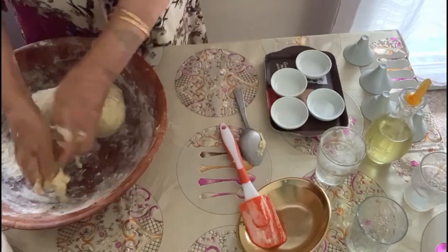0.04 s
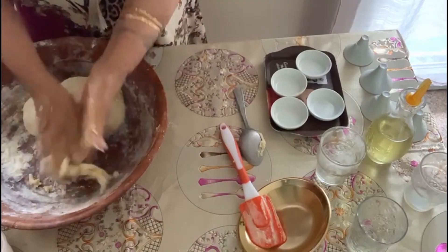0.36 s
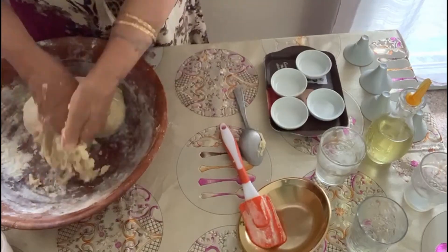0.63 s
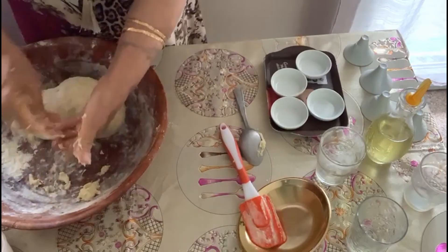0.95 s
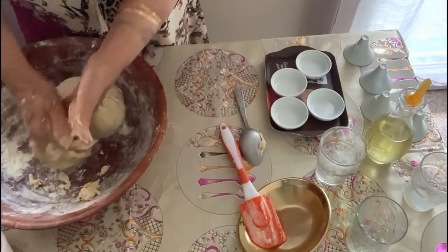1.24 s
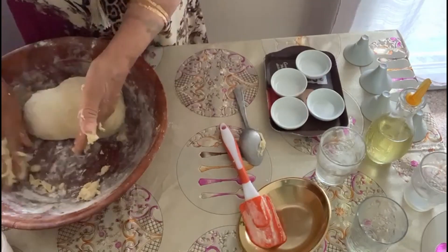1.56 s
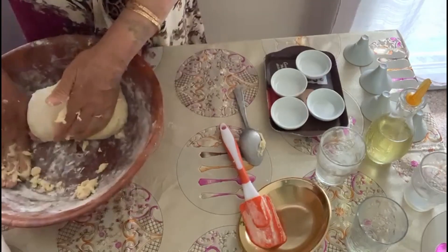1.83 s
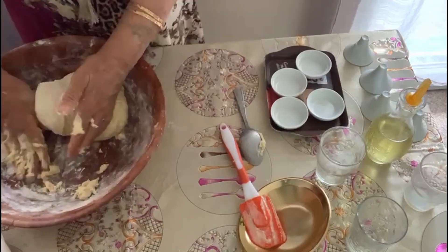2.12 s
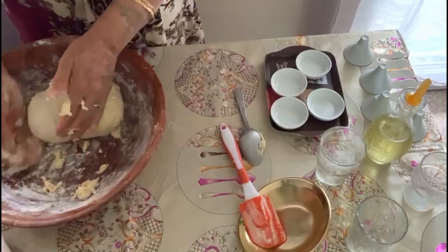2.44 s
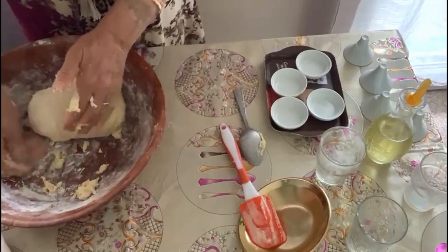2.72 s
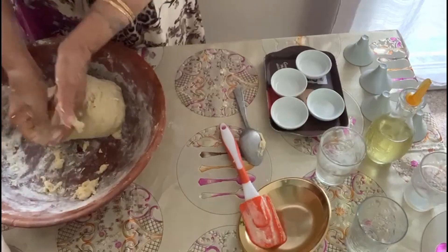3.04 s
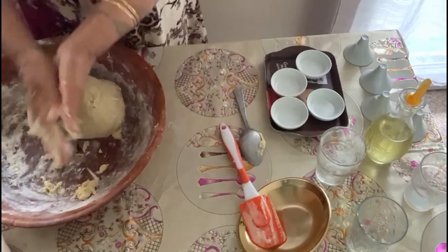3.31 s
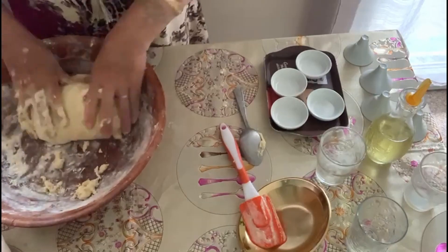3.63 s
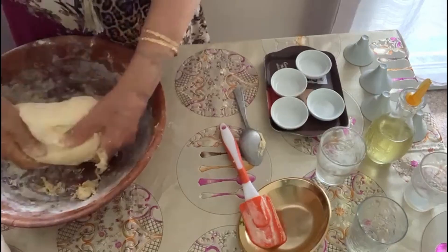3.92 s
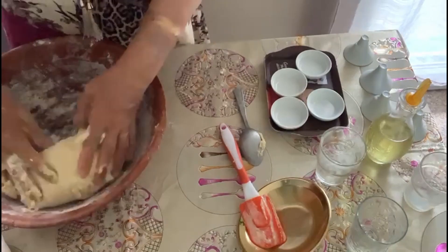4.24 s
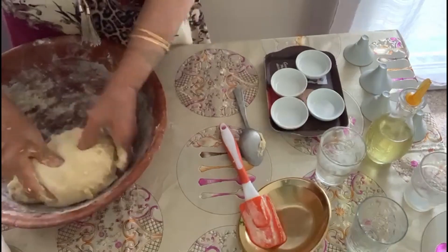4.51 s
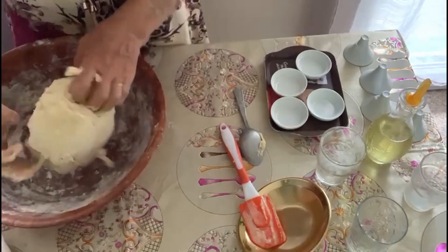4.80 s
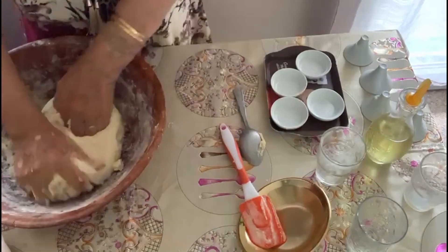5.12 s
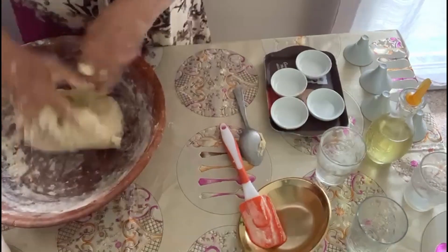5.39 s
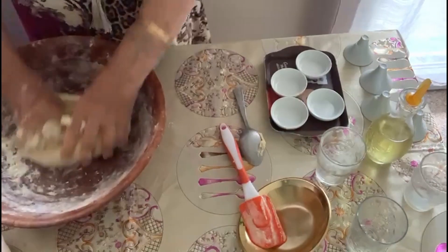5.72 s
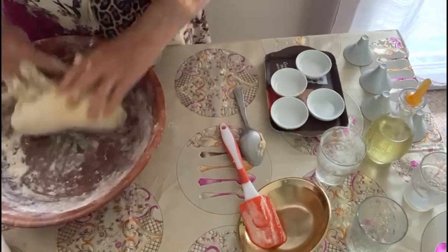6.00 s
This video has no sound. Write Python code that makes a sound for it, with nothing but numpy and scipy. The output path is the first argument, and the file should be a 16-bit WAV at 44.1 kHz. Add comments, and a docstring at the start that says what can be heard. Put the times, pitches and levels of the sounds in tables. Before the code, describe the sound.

Quiet dry rubbing and sticky pops of dough being kneaded, broken by a clay bowl knocking the table and dough thudding down.

```python
"""Soft fingertip pats and dry rubbing come first: hands work a lump of dough in a wide clay bowl.
The bowl is on a kitchen table, close to a stereo microphone and to its left. Palms wipe the floury
clay and roll the dough, which rumbles, peels and pops. The bowl tips and gives the table one loud knock;
later the dough is thrown down with a dull thump. Bangles tinkle faintly; the small room hums and answers.
"""
import sys
import numpy as np
from scipy import signal
from scipy.fft import rfft, irfft, next_fast_len
from scipy.io import wavfile
from scipy.ndimage import uniform_filter1d, map_coordinates

SR = 44100
rng = np.random.default_rng(int(sys.argv[2]) if len(sys.argv) > 2 else 0)


def transcribe(signal):
    """Save signal, clipped to [-1, 1], as a 16-bit WAV file at the path in sys.argv[1]."""
    frames = np.atleast_2d(signal).T
    limited = np.clip(frames, -1, 1)
    pcm = np.round(limited * 32767).astype(np.int16)
    wavfile.write(sys.argv[1], SR, pcm)


N = 266845


def amp(db):
    """Decibels to gain."""
    return 10 ** (np.asarray(db) / 20)


def unit(x):
    """Scale to rms 1."""
    return x / np.sqrt(np.mean(x ** 2) + 1e-20)


def along(points, hz):
    """Read (f/Hz, value) points on a log frequency axis."""
    f, values = np.transpose(points)
    return np.interp(np.log(hz + 1), np.log(f + 1), values)


def envelope(start, length, attack_s, sag_db_per_s, fade_db_per_s):
    """Gain for one move of the hand: a smooth rise, a sagging hold and a fade."""
    t = np.maximum(np.arange(N) / SR - start, 0)
    rise = np.sin(np.pi / 2 * np.minimum(t / attack_s, 1)) ** 2
    return rise * amp(-sag_db_per_s * t - fade_db_per_s * np.maximum(t - length, 0))


def pulse(t, attack_s, t60):
    """Gain for one touch: a rounded onset and an exponential decay."""
    return amp(-60 * t / t60) * (1 - np.exp(-t / attack_s))


def wobble(rate):
    """A smooth random curve, rate knots a second."""
    knots = rng.standard_normal(int(N * rate / SR) + 4)
    return map_coordinates(knots, [np.arange(N) * rate / SR])


def filtered(x, response):
    """Pass x through a frequency response."""
    n = x.shape[-1]
    padded = next_fast_len(n + 8192)
    return irfft(rfft(x, padded) * response(np.fft.rfftfreq(padded, 1 / SR)), padded)[..., :n]


def colour(x, spectrum):
    """Shape x by a (f/Hz, level/dB) spectrum, at rms 1."""
    return unit(filtered(x, lambda hz: amp(along(spectrum, hz))))


def edge(x, hz, kind, order):
    """Causal low-pass or high-pass."""
    return signal.sosfilt(signal.butter(order, min(hz, .45 * SR), kind, fs=SR, output='sos'), x)


def resonance(f, hz, width_hz):
    """Response of one resonance."""
    return 1j * f * width_hz / (hz * hz - f * f + 1j * f * width_hz)


def ring(modes, t):
    """Decaying modes, at slightly new strengths for each blow."""
    return sum(amp(db + rng.normal() - 60 * t / t60) * np.sin(2 * np.pi * hz * t)
               for hz, db, t60 in modes)


def add(track, start, x):
    """Mix x into the track from start, in seconds."""
    part = track[:, round(start * SR):][:, :x.shape[-1]]
    part += x[..., :part.shape[1]]


# Likeness of the microphone's two sides: f/Hz, correlation
LIKENESS = [(60, 0.85), (140, 0.68), (280, 0.45), (600, -0.1), (1000, 0.1), (1600, 0.35), (2800, 0.25),
            (6700, 0.15), (8000, 0.98), (9900, 0.98), (10700, 0.7), (11700, 0.55)]
def spread(pair):
    """Two unrelated signals become left and right, more or less alike at each frequency."""
    def mid_side_gains(hz):
        angle = np.arccos(np.clip(along(LIKENESS, hz), -1, 1)) / 2
        return np.array([np.cos(angle), np.sin(angle)])
    mid, side = filtered(pair, mid_side_gains)
    return np.array([mid + side, mid - side])


def noise():
    """Stereo white noise."""
    return spread(rng.standard_normal((2, N)))


# Decay of the small kitchen: f/Hz, t60/s
KITCHEN_DECAY = [(100, 0.42), (400, 0.45), (2000, 0.36), (6000, 0.61), (12000, 0.039)]
def in_room(x, wet_db):
    """The close sound reaches the microphone with a fresh diffuse tail from the walls."""
    hz, t, spectra = signal.stft(rng.standard_normal((2, SR // 2)), SR, nperseg=256)
    decay = pulse(t, attack_s=0.0012, t60=along(KITCHEN_DECAY, hz)[:, None])
    tail = signal.istft(spectra * decay, SR, nperseg=256)[1]
    tail = edge(spread(tail / np.linalg.norm(tail[0])), 172, 'high', order=3)
    return x + amp(wet_db) * signal.fftconvolve(x[None], tail, axes=1)[:, :len(x)]


# Bands of the kitchen's drone: f/Hz, width/Hz, level/dB
DRONE_BANDS = [(53.6, 21.8, -63), (260, 29, -66.5), (320, 60, -78), (386.8, 14.5, -78), (548, 99, -81.5)]
# Quiet air around the microphone: f/Hz, level/dB
AIR_SPECTRUM = [(15, -51.5), (25, -28), (63, -15), (165, -1), (255, 2.5), (314, -43), (406, -1.5),
                (487, -28.5), (881, -11), (1140, -23), (1440, -19), (2230, -32), (4260, -28.5), (8110, -42),
                (12000, -41), (15500, -90.5), (22000, -120)]
def room_tone():
    """The kitchen behind the hands: a low steady drone in quiet air."""
    drone = sum(amp(db) * unit(filtered(noise(), lambda f: resonance(f, hz, width) ** 2))
                for hz, width, db in DRONE_BANDS)
    return drone + amp(-67.5) * colour(noise(), AIR_SPECTRUM)


# The arms lean on the dough: t/s, length/s, level/dB
ARM_PRESSES = [(0.603, 0.2, -87), (1.302, 0.048, -57.5), (1.59, 0.12, -57.5), (2.485, 0.22, -77),
               (2.662, 0.036, -56.5), (2.849, 0.16, -60), (3.137, 0.058, -87), (3.68, 0.23, -55),
               (4.458, 0.059, -47), (4.843, 0.35, -59.5), (5.292, 0.031, -54.5), (5.906, 0.16, -59)]
# Rumble through the table: f/Hz, level/dB
RUMBLE_SPECTRUM = [(30, -35.5), (60, 3), (90, 3.5), (145, 5), (200, -8), (350, -7), (700, -11.5),
                   (1500, -91)]
def pressing():
    """Dough yields under the palms and rumbles through the table."""
    power = amp(-66.5 + 2.5 * wobble(6.9)) ** 2  # light, uneven handling between presses
    for start, length, db in ARM_PRESSES:
        weight = envelope(start, length, attack_s=0.053, sag_db_per_s=10.5, fade_db_per_s=140)
        power += (amp(db) * weight) ** 2
    return np.sqrt(power) * colour(noise(), RUMBLE_SPECTRUM)


# Bangles meet above the bowl: t/s, level/dB
WRIST_TOUCHES = [(4.700, -60), (4.803, -73)]
# Modes of a bangle: f/Hz, level/dB, t60/s
BANGLE_MODES = [(5335, -6, .1), (5572, 0, .11), (5690, -7, .07)]
def bangles():
    """Thin metal rings touch on the wrist, damped by the skin."""
    out, t = np.zeros((2, N)), np.arange(SR // 2) / SR
    for start, db in WRIST_TOUCHES:
        tinkle = ring(BANGLE_MODES, t) * (1 - np.exp(-t / .004))
        add(out, start, amp(db) * in_room(tinkle, wet_db=-18))
    return out


def pats(span_s=1.2, per_s=22, centre_hz=513, spread_octaves=0.66):
    """At the opening, fingertips dab crumbs off the clay: soft, dull touches at random moments."""
    out, t = np.zeros((2, N)), np.arange(SR // 4) / SR
    for when, size, pitch in rng.uniform(-0.97, 1, (round(per_s * span_s), 3)):
        hz = centre_hz * 2 ** (spread_octaves * pitch)
        touch = rng.standard_normal(len(t)) * pulse(t, attack_s=.012, t60=.07)
        pat = filtered(touch, lambda f: resonance(f, hz, hz / 2) ** 2)
        pat /= np.abs(pat).max()
        add(out, span_s * (when + 1) / 2, amp(-66 + 3 * size) * in_room(pat, wet_db=-3.5))
    return out


def grains(per_s, size_range_db, smear):
    """Tiny slips of random size; smear is the share of power blurred into a rush by the room."""
    size = amp(size_range_db * rng.random(N)) * rng.choice([-1, 1], N)
    slips = unit(size * (rng.random(N) < per_s / SR))
    return np.sqrt(1 - smear) * slips + np.sqrt(smear) * noise()


# Folded dough peels off skin and clay: t/s, length/s, level/dB
DOUGH_PEELS = [(1.31, 0.021, -73.5), (2.999, 0.025, -70), (4.014, 0.029, -76), (4.891, 0.18, -70),
               (5.133, 0.099, -66.5), (5.282, 0.05, -64.5)]
# Snapping threads, heard close: f/Hz, level/dB
PEEL_SPECTRUM = [(1200, -18), (2400, -3), (3300, 0), (4300, -4), (6500, -14), (11000, -24)]
def peeling():
    """Sticky threads snap one by one in a fine crackle as the dough pulls away."""
    pull = sum(amp(db) * envelope(start, length, attack_s=.012, sag_db_per_s=0, fade_db_per_s=260)
               for start, length, db in DOUGH_PEELS)
    return pull * colour(grains(per_s=220, size_range_db=12, smear=.5), PEEL_SPECTRUM)


# Short sticky pops and the quick juddering slips of a scrape on the clay: t/s, level/dB, f/Hz, t60/s
POPS_AND_SLIPS = [(0.122, -64.5, 2130, 0.023), (0.345, -65, 1510, 0.023), (1.2144, -54, 1730, .015),
                  (1.3303, -50.5, 2205, 0.021), (1.475, -65, 2300, 0.0089), (1.6117, -50.5, 2100, 0.033),
                  (2.4045, -59.5, 1700, 0.011), (2.653, -45, 2160, 0.04), (2.763, -49, 1980, 0.012),
                  (2.7757, -38, 1443, 0.034), (2.7864, -42, 2150, 0.018), (2.797, -40, 1739, 0.038),
                  (3.4106, -53.5, 2030, 0.027), (3.5227, -56, 1800, 0.011), (3.594, -54.5, 2350, 0.021),
                  (4.014, -50.5, 2446, 0.035), (4.42, -48.5, 2140, 0.042), (4.427, -48.5, 1189, 0.047),
                  (4.4797, -31.5, 2090, 0.018), (4.5119, -36, 1897, 0.057), (4.6977, -51.5, 1274, 0.018),
                  (4.802, -66, 1260, .025), (4.839, -58, 1033, 0.015), (4.8457, -50.5, 910, 0.026),
                  (4.886, -46, 826, 0.12), (4.919, -40.5, 895, 0.088)]
def pops_and_slips():
    """Sticky dough pops and a scrape judders on the clay: each is a brief ring with a soft crackle."""
    out, t = np.zeros((2, N)), np.arange(SR // 2) / SR
    for start, db, hz, t60 in POPS_AND_SLIPS:
        band = filtered(rng.standard_normal(len(t)), lambda f: resonance(f, hz, 1.1 * hz))
        crackle = amp(-1.5) * unit(edge(band, 2.22 * hz, 'low', order=2))
        tick = (np.sin(2 * np.pi * hz * t) + crackle) * pulse(t, attack_s=0.00096, t60=t60)
        add(out, start, amp(db) * in_room(tick / np.abs(tick).max(), wet_db=-2))
    return out


def crumbs(per_s=260, centre_hz=2150, size_range_db=10, life_cycles=24):
    """Dry crumbs tick under the palm, each at its own pitch, which drifts as the hand changes shape."""
    when, size, pitch = rng.random((round(per_s * N / SR), 3)).T[..., None]
    onset, age = (when * N).astype(int), np.arange(SR // 50)
    scatter_octaves = .15 * np.log(pitch / (1 - pitch)).clip(-4, 4)
    drift_octaves = .1 * wobble(12)[onset]
    hz = centre_hz * 2 ** (scatter_octaves + drift_octaves)
    cycles = hz * age / SR
    ticks = amp(size_range_db * size - 60 * cycles / life_cycles) * np.sin(2 * np.pi * cycles)
    return unit(np.bincount((onset + age).ravel(), ticks.ravel(), N)[:N])


def shifting_gaps(x, depth_db):
    """The gaps under a moving palm change shape, so short-lived resonances come and go."""
    spectra = signal.stft(x, nperseg=512)[2]
    ripple = rng.standard_normal(spectra.shape[1:])
    for _ in range(2):
        ripple = uniform_filter1d(ripple, size=4, axis=0)  # across frequency
        ripple = uniform_filter1d(ripple, size=11, axis=1)  # across time
    return unit(signal.istft(spectra * amp(depth_db * unit(ripple)), nperseg=512)[1][:, :N])


OPEN_HAND_HZ = 871
def hollow_rush(hz, width_hz):
    """Friction noise in one moving resonance, the hollow between palm and clay."""
    band = filtered(noise(), lambda f: (f > 0) * resonance(f, OPEN_HAND_HZ, width_hz) ** 2)
    shift = np.exp(2j * np.pi * np.cumsum(hz - OPEN_HAND_HZ) / SR)
    return unit(np.real(signal.hilbert(band, next_fast_len(N))[:, :N] * shift))


# Skin dragging on clay, and loose flour, both heard close: f/Hz, level/dB
DRAG_SPECTRUM = [(250, -24), (500, -4), (700, -1.5), (900, -2), (1200, -4), (1480, -7), (1800, -.5),
                 (2120, 2.5), (2500, -2.5), (2900, -5.5), (4000, -13), (8000, -24)]
FLOUR_SPECTRUM = [(1500, -14), (3000, 2), (4500, 3.5), (6000, 3), (7000, 0), (8000, -1.5), (9500, -3),
                  (11300, -1.5), (12000, -16), (13000, -40)]
def friction(drag, hollow, flour, hollow_hz):
    """Skin, dough and crumbs slip over clay and ring the hollow under the hand; flour adds a fine hiss."""
    slips = shifting_gaps(grains(per_s=900, size_range_db=11, smear=.65), depth_db=3.1)
    dust = shifting_gaps(grains(per_s=1000, size_range_db=14, smear=.6), depth_db=3.2)
    grip = amp(.8 * wobble(45))
    scrape = amp(3.5) * drag * colour(slips, DRAG_SPECTRUM)
    rush = amp(-1) * hollow * hollow_rush(hollow_hz, width_hz=207)
    grit = in_room(amp(-6) * drag * crumbs(), wet_db=-4)
    hiss = flour * colour(dust, FLOUR_SPECTRUM)
    return grip * (scrape + rush) + grit + hiss


# Strokes in the bowl: t/s, length/s, level/dB, hollow offset/dB, flour offset/dB, hollow's first f/Hz
HAND_STROKES = [(-0.04, 0.012, -70.5, 5, 5.5, 900), (0.26, 0.1, -86, 14.5, 1, 900),
                (0.396, 0.055, -77.5, -6, 5.5, 900), (0.583, 0.091, -79, 3, 12, 906),
                (0.646, 0.14, -67, -25, -1.5, 1000), (0.763, 0.012, -66.5, -14, 13, 900),
                (1.179, 0.039, -77.5, 9, 9.5, 999), (1.318, 0.057, -72, 4.5, -5, 1013),
                (2.147, 0.061, -60.5, -24, 7.5, 896), (2.418, 0.049, -72.5, -27, 4.5, 900),
                (2.473, 0.081, -60.5, -4, 3.5, 900), (2.59, 0.19, -63.5, -10, -1, 900),
                (2.735, 0.034, -53.5, 3, 7.5, 2140), (3.049, 0.094, -68, 3.5, -1.5, 1044),
                (3.106, 0.16, -80, 15, 3.5, 1036), (3.301, 0.19, -69.5, -15, -2, 908),
                (3.573, 0.14, -73.5, 4, -24, 900), (3.664, 0.087, -58, 2, 1, 1451),
                (3.757, 0.17, -62, 0.5, -1.5, 950), (4.432, 0.12, -54.5, -2, -2, 1100),
                (4.869, 0.18, -76.5, 13.5, -21, 930), (5.063, 0.13, -66, 2, -4, 950),
                (5.241, 0.097, -70, 3.5, 0, 901), (5.45, 0.15, -78, 6.5, -7.5, 900),
                (5.59, 0.11, -62.5, 2, 1, 993), (5.791, 0.16, -75.5, 2, 2.5, 900),
                (6.004, 0.1, -67.5, -6, -13, 900)]
def rubbing(opening_s=0.12):
    """Short strokes gather speed, slow and lift off; the hollow sinks in pitch as the hand opens."""
    power, t = 0, np.arange(N) / SR
    for start, length, db, hollow_db, flour_db, _ in HAND_STROKES:
        stroke = envelope(start, length, attack_s=0.06, sag_db_per_s=24, fade_db_per_s=169.5)
        power = power + np.outer(amp([db, db + hollow_db, db + flour_db]), stroke) ** 2
    drag, hollow, flour = np.sqrt(power)
    starts, *_, start_hz = np.transpose(HAND_STROKES)
    current = np.maximum(np.searchsorted(starts, t) - 1, 0)
    cupped = np.exp(-np.abs(t - starts[current]) / opening_s)
    hollow_hz = OPEN_HAND_HZ + (start_hz[current] - OPEN_HAND_HZ) * cupped
    return friction(drag, hollow, flour, hollow_hz)


# The palm's way round the bowl: t/s, level/dB, hollow offset/dB, flour offset/dB, hollow f/Hz
WIPE_PATH = [(1.58, -88, 2, -2, 880), (1.625, -67.5, 9.5, -1, 900), (1.679, -57, -3, -3, 920),
             (1.77, -65, -7.5, 1.5, 980), (1.82, -60, 4, -1.5, 1190), (1.875, -62, 6.5, 3.5, 1170),
             (1.919, -62.5, 6.5, 7.5, 980), (2.021, -62.5, 6.5, 7, 880), (2.16, -67.5, -5, 10, 860),
             (2.37, -96, 6, -7, 860)]
def wiping():
    """One long sweep of the palm around the floury clay."""
    t = np.arange(N) / SR
    times, *columns = np.transpose(WIPE_PATH)
    db, hollow_db, flour_db, hollow_hz = [np.interp(t, times, column) for column in columns]
    drag = amp(db) * (t > times[0]) * (t < times[-1])
    return friction(drag, drag * amp(hollow_db), drag * amp(flour_db), hollow_hz)


# Hard contacts of the bowl, near the microphone: t/s, level/dB, low-pass f/Hz
BOWL_KNOCKS = [(0.098, -61, 1270), (2.6528, -47.5, 2420), (2.997, -53, 3690), (4.2142, -22.5, 3700),
               (4.292, -42, 2440), (4.888, -59, 2220), (5.6867, -48, 2020)]
# The crack of contact, and the clop of air forced from under the bowl's foot: f/Hz, level/dB
CRACK_SPECTRUM = [(100, -16), (300, 1), (480, 1), (700, -6), (1000, 4.5), (1400, -1), (1750, 4.5),
                  (2200, -1.5), (2800, -6), (3700, -6.5), (4600, -15), (6200, -15.5), (7500, -18),
                  (8700, -12), (10200, -18), (11200, -14)]
CLOP_SPECTRUM = [(200, -14), (400, -1), (550, -2), (700, -10), (900, 0), (1200, 1.5), (1500, -5),
                 (3000, -22), (8000, -45)]
# Modes of the clay wall, damped by the dough: f/Hz, level/dB, t60/s
CLAY_MODES = [(818, -12, .1), (897, -8, .14), (980, -7, .1), (1080, -7, .08), (1240, -10, .06),
              (1460, -15, .05), (1700, -6, .04), (1785, 7.5, .02), (1880, -3, .035), (2180, -11, .035),
              (2680, -8, .025)]
def knocks(scuff_s=.012):
    """Clay meets table or fingers: a scuff, a crack that fills the room, a clop and a short, close ring."""
    out, t = np.zeros((2, N)), np.arange(SR * 3 // 4) / SR
    before, after = np.maximum(scuff_s - t, 0), np.maximum(t - scuff_s, 0)
    burst = amp(-5.5 - 60 * before / 0.026 - 60 * after / 0.025)
    squeeze = amp(-10.5 - 60 * after / 0.062) * (t > scuff_s)
    for start, db, top_hz in BOWL_KNOCKS:
        crack = burst * colour(rng.standard_normal(len(t)), CRACK_SPECTRUM)
        clop = squeeze * colour(rng.standard_normal(len(t)), CLOP_SPECTRUM)
        clay = in_room(amp(-6) * ring(CLAY_MODES, after), wet_db=-6)
        knock = in_room(crack + clop, wet_db=0.1) + clay
        add(out, start - scuff_s, amp(db) * edge(knock, top_hz, 'low', order=1))
    return out


# Soft blows on bowl and table, near the microphone: t/s, level/dB, push's first and low-pass f/Hz,
# push's last f/Hz, table offset/dB, drum note offset/dB, splat offset/dB
SOFT_BLOWS = [(0.643, -48.5, 174, 67.6, -1, -0.5, -12), (0.792, -51, 192, 69.5, 0.5, -2.5, -15),
              (1.623, -48.5, 400, 112, 1.5, 1.5, -18), (1.715, -46, 185, 92, 2, 1, -7),
              (2.451, -40, 401.6, 214, -4, 0.5, -12), (2.468, -54.5, 151, 48.4, 2.5, 2, 6),
              (2.655, -41.5, 910, 270, 6, -2, -9), (2.856, -36.5, 330, 116, -10, 2, -11.5),
              (3.744, -38.5, 185.7, 81.3, -3.5, 0, -13), (4.2167, -19, 495, 93, -1, -0.5, -9.5),
              (4.487, -45, 571, 81, -5, 4, -12), (4.927, -52.5, 324, 83, 9.5, 0.5, -10.5),
              (5.006, -49, 577, 216.8, 9, -4.5, -15), (5.688, -13.5, 340, 159, 0.5, 2, -22)]
# The toneless slump of the soft mass: f/Hz, level/dB
SPLAT_SPECTRUM = [(25, -30), (50, -3), (110, 4), (170, -4), (320, -1), (430, -6), (600, -13), (1000, -24),
                  (3000, -60)]
# Modes of the loaded table (the second, its drum note, depends on the spot hit): f/Hz, level/dB, t60/s
TABLE_MODES = [(83.2, -1.5, 0.2), (145.45, -4, 0.37), (197.7, -14, 0.39), (222.4, -26, 0.4),
               (246, -16, 0.12), (301, -13, 0.18), (332.5, -18, 0.19), (395, -28, 0.26), (427, -26, 0.22),
               (526, -33, 0.44), (638, -18, 0.35)]
def thumps(sharp_share=.03, load_s=.03, settle_s=.14, settle_db_per_s=190):
    """Dough flattens as it lands, so its push falls in pitch; it splats, puffs air and rings the table."""
    out, t = np.zeros((2, N)), np.arange(SR * 3 // 4) / SR
    # The table rings sharp until the weight has come on; then the spreading dough damps it.
    ring_t = t + sharp_share * load_s * (1 - np.exp(-t / load_s))
    settle = amp(-settle_db_per_s * np.maximum(t - settle_s, 0))
    push_gain = amp(3 - 60 * t / 0.042) * (1 - np.exp(-(t / 0.0063) ** 2))
    for start, db, high_hz, low_hz, table_db, drum_db, splat_db in SOFT_BLOWS:
        push_hz = low_hz + (high_hz - low_hz) * np.exp(-t / 0.0066)
        push = push_gain * np.sin(2 * np.pi * np.cumsum(push_hz) / SR)
        air = filtered(rng.standard_normal(len(t)), lambda f: resonance(f, hz=650, width_hz=140) ** 2)
        puff = unit(air) * amp(-20.5 - 60 * t / .18)
        slump = colour(rng.standard_normal(len(t)), SPLAT_SPECTRUM)
        splat = amp(splat_db) * slump * pulse(t, attack_s=0.012, t60=0.29)
        modes = sum(amp(drum_db * (k == 1)) * ring([mode], ring_t) for k, mode in enumerate(TABLE_MODES))
        table = amp(table_db) * edge(modes * settle, 0.77 * low_hz, 'high', order=5)
        thump = edge(push + puff + splat + table, high_hz, 'low', order=4)
        add(out, start, amp(db) * in_room(thump, wet_db=-8))
    return out


# Balance at the microphone: f/Hz, left minus right level/dB
LEFT_BALANCE = [(60, 4), (190, 4), (400, 5), (1100, 1.2), (2000, -0.4), (11000, 0.3)]
# Lead of the left microphone port (in the treble the ports are opposed): f/Hz, phase/rad
LEFT_LEAD = [(100, 0.03), (400, 0.1), (1000, 0.4), (2100, 0.75), (2800, 1.9), (5000, 1.9), (5600, 1.4),
             (6700, 1.3), (7500, 3.12), (10050, 3.16), (10600, 4.2), (11300, 4.8), (11700, 6)]
def scene():
    """The bowl stands close on the left, so its sound arrives there first and its bass leans that way."""
    sound = (rubbing() + wiping() + pressing() + thumps() + knocks()
             + pops_and_slips() + peeling() + bangles() + room_tone() + pats())
    sides = np.array([[.5], [-.5]])
    def placement(hz):
        return amp(sides * along(LEFT_BALANCE, hz)) * np.exp(1j * sides * along(LEFT_LEAD, hz))
    return filtered(sound, placement)


BAND_LIMIT_HZ = 11850
def record(dry):
    """The camera's microphone keeps nothing above its band limit."""
    return filtered(dry, lambda hz: 1 / np.sqrt(1 + (hz / BAND_LIMIT_HZ) ** 120))


dry = scene()
out = record(dry)
transcribe(out)
```